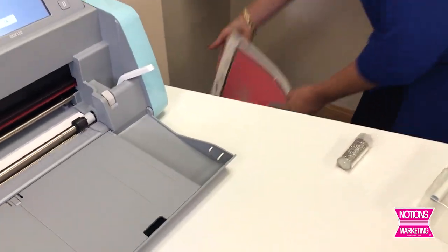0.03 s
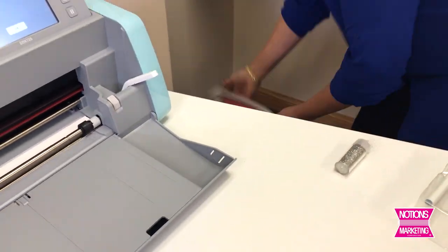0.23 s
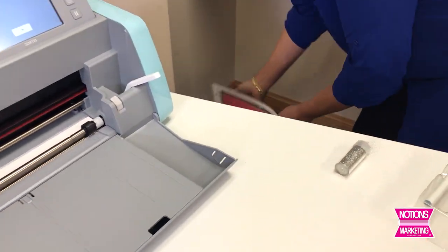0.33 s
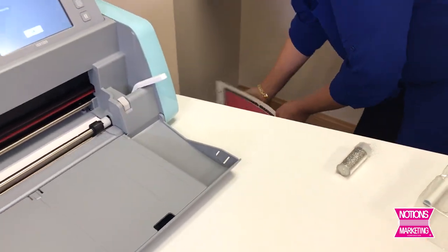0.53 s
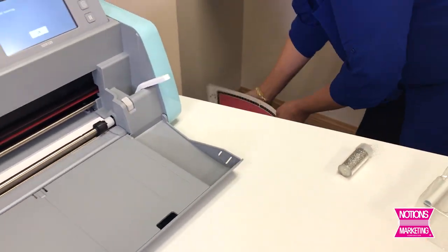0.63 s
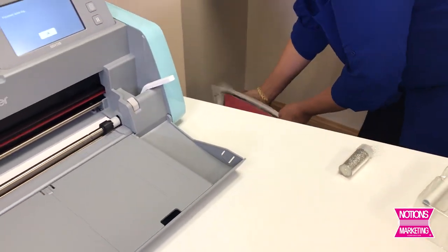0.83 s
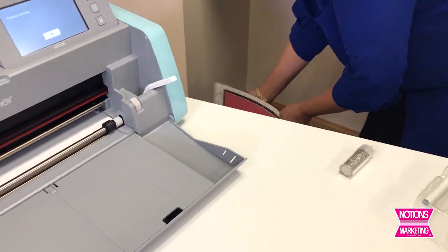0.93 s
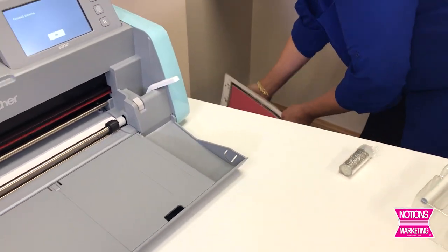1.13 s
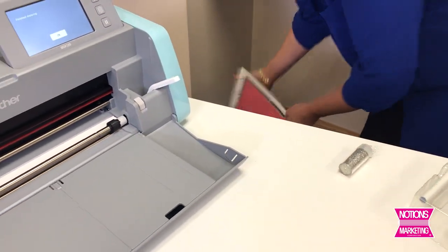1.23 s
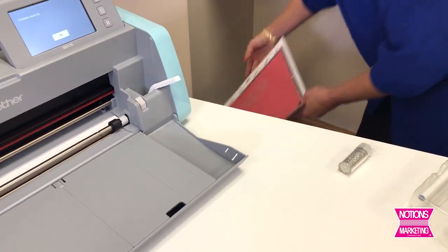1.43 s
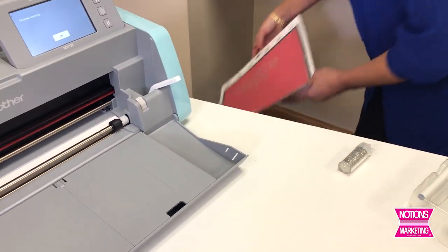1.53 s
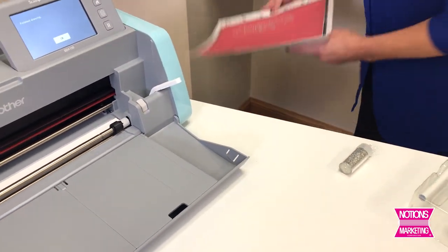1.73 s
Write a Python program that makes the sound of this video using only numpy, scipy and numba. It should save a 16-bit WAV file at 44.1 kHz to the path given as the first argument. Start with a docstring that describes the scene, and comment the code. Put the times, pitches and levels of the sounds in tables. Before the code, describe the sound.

A stiff plastic mat knocks against a hollow bin in quick, bright, rattling taps with low booms, after a brief rustle and scrape; it then quiets to faint handling. Close microphone, small room.

```python
"""Quick bright taps, about seven a second: a stiff plastic mat knocked against a hollow bin below a table.
Each tap is a noise crack, then the sheet rattles on as dense clicks that ring the bin, and the hollow booms.
Swelling sines thud, band-passed noise bursts tick like loose grains, and filtered clicks make the sheet
rustle in the hands and scrape the rim. A small room answers with a short echo, over noise hush, hum and whine."""
import sys
import numpy as np
from scipy import signal
from scipy.fft import rfft, irfft
from scipy.io import wavfile
from numba import njit

SR = 44100
rng = np.random.default_rng(int(sys.argv[2]) if len(sys.argv) > 2 else 0)


def inscribe(sig):
    """Save sig as 16-bit PCM at rate SR to the path in sys.argv[1].

    A 1-D sig is mono; a 2-D sig holds one channel per row.
    Samples are clipped to [-1, 1] before scaling.
    """
    pcm = np.round(np.clip(np.atleast_2d(sig).T, -1, 1) * 32767)
    wavfile.write(sys.argv[1], SR, pcm.astype(np.int16))


def natural_amplitude(level_db):
    """Convert a level in decibels to a linear amplitude factor, elementwise."""
    exponent = np.asarray(level_db, float) / 20
    return 10 ** exponent


N = 79380  # 1.8 s


def unit(x):
    """Scale to rms 1."""
    return x / np.sqrt(np.mean(x ** 2))


def colour(x, points):
    """Shape the spectrum through (hz, db) points joined along log frequency, rms 1."""
    hz = np.arange(len(x) // 2 + 1) * SR / len(x) + 1
    point_hz, point_db = np.array(points).T
    gain_db = np.interp(np.log(hz), np.log(point_hz), point_db)
    return unit(irfft(rfft(x) * natural_amplitude(gain_db), len(x)))


def band(x, hz, width_hz):
    """Second-order Butterworth band-pass, its edges kept within the audible range."""
    edges_hz = np.clip([hz - width_hz / 2, hz + width_hz / 2], 20, SR / 2.1)
    return signal.sosfilt(signal.butter(2, edges_hz, "bandpass", fs=SR, output="sos"), x)


def fade(t, t60):
    """Falls 60 dB in t60 s."""
    return np.exp(-np.log(1000) * t / t60)


def swell(t, rise, t60):
    """Rises smoothly for rise s, then fades."""
    rising = np.sin(np.pi / 2 * np.clip(t / rise, 0, 1)) ** 2
    return rising * fade(np.maximum(t - rise, 0), t60)


def clicks(size, per_s, spread_db):
    """Random clicks of either sign and very uneven size, rms 1."""
    chance, sign, size_draw = rng.random((3, size))
    struck = chance < per_s / SR
    return unit(struck * np.sign(sign - .5) * natural_amplitude(-spread_db * np.log(1 - size_draw)))


def level_curve(points):
    """Amplitude over the whole scene through (time_s, level_db) points."""
    return natural_amplitude(np.interp(np.arange(N) / SR, *np.array(points).T))


def add(out, at_s, x):
    """Mix x in from at_s."""
    i = int(at_s * SR)
    out[i:i + len(x)] += x[:N - i]


def room_tone():
    """Broad hush of coloured noise, wavering hum from narrow noise bands and a faint high steady whine."""
    # spectrum of the hush: hz, db (per Hz, relative)
    hush_colour = [(25, -60), (53, -6), (96, -7), (133, 10), (156, -2), (447, -28), (586, -18), (688, -28),
                   (1280, -27.5), (2140, -32), (2320, -33.5), (15700, -41)]
    # wavering low hum: centre_hz, width_hz, level_db
    hum_bands = [(48.1, 1.5, -56), (134.7, 13.4, -58.5)]
    hush_db, whine_hz, whine_db = -47.5, 14250, -78
    hush = natural_amplitude(hush_db) * colour(rng.standard_normal(N), hush_colour)
    hum = np.zeros(N)
    for hz, width_hz, db in hum_bands:
        hum += natural_amplitude(db) * unit(band(rng.standard_normal(N), hz, width_hz))
    whine = natural_amplitude(whine_db) * np.sin(2 * np.pi * whine_hz * np.arange(N) / SR)
    return hush + hum + whine


def echo(x):
    """A small room as a decaying noise tail: lows linger, highs die early."""
    low_t60_s, high_t60_s, split_hz, onset_s = 0.53, 0.17, 250, 0.004
    t = np.arange(SR // 2) / SR
    noise = rng.standard_normal(len(t))
    low = signal.sosfilt(signal.butter(1, split_hz, fs=SR, output="sos"), noise)
    high = noise - low
    tail = low * fade(t, low_t60_s) + high * fade(t, high_t60_s)
    tail = tail * np.clip(t / onset_s, 0, 1)
    return signal.fftconvolve(x, tail / np.sqrt(np.sum(tail ** 2)))[:N]


def rustle():
    """Fine hiss of the flexing sheet: dense tiny clicks run together."""
    # how loud the sheet hisses: time_s, level_db
    rustle_levels = [(0, -59), (.19, -56), (.26, -55.5), (.35, -50.5), (.385, -61), (.45, -63),
                     (.55, -75.5), (.72, -59), (.78, -87), (.86, -56), (.92, -68), (1.03, -94), (1.4, -69),
                     (1.57, -64), (1.8, -62.5)]
    # spectrum of the hiss: hz, db (per Hz, relative)
    rustle_colour = [(590, -28), (1000, -3), (1140, -3), (1700, 4), (1930, -16), (2320, -1.5), (2510, -2),
                     (4080, -1), (15700, -7.5)]
    per_s, spread_db = 8100, -2
    return colour(clicks(N, per_s, spread_db), rustle_colour) * level_curve(rustle_levels)


def scrape():
    """The sheet scrapes the rim and the hands: sparser, coarser and darker clicks."""
    # how loud the sheet scrapes: time_s, level_db
    scrape_levels = [(.10, -57.5), (.2, -57), (.28, -40), (.33, -35.5), (.365, -39), (.385, -49.5),
                     (.395, -36.5), (.43, -55.5), (.45, -55), (1.5, -62), (1.62, -61.5), (1.685, -52.5),
                     (1.71, -65.5), (1.75, -54), (1.78, -64.5)]
    # spectrum of the scraping: hz, db (per Hz, relative)
    scrape_colour = [(180, -2.5), (300, 1.5), (538, -11), (937, -8), (1990, -11), (2170, -15),
                     (3470, -16.5), (9000, -34.5), (11700, -62), (19800, -120)]
    per_s, spread_db = 2200, 2.6
    return colour(clicks(N, per_s, spread_db), scrape_colour) * level_curve(scrape_levels)


def ticks():
    """Grains and edges tick: short noise bursts, each in its own band, sharpest in the first instant."""
    # grains and edge ticks: start_s, level_db (of the body, before the snap), centre_hz, width_hz, t60_s
    tick_table = [(0.117, -45.5, 1680, 400, 0.045), (0.12, -52.5, 7900, 8150, 0.044),
                  (0.222, -37, 7500, 5500, 0.035), (0.257, -46.5, 13000, 4970, 0.039),
                  (0.292, -47, 7800, 9000, .05), (0.293, -56, 1650, 300, 0.082),
                  (.322, -48, 3540, 400, .06), (0.356, -48, 2750, 298, 0.083),
                  (0.36, -44, 4270, 500, 0.045), (0.3907, -43, 8800, 15700, 0.017),
                  (0.394, -47, 7560, 13100, 0.06), (0.484, -43, 7830, 13500, 0.13),
                  (0.532, -58, 14100, 2917, 0.022), (.566, -45, 11700, 9900, 0.018),
                  (.59, -59, 13500, 4000, 0.22), (0.692, -47, 7960, 12000, 0.073),
                  (0.695, -49.5, 5700, 900, 0.074), (.694, -52, 9300, 900, .07),
                  (.712, -54, 13300, 2540, 0.1), (.731, -57, 13500, 2000, 0.099),
                  (.826, -48, 9100, 4030, 0.08), (0.926, -38.5, 2500, 3530, 0.082),
                  (0.98, -46.5, 8500, 11600, 0.087), (1.121, -45.5, 9600, 10400, 0.047),
                  (1.335, -58, 5000, 7000, 0.12), (1.362, -48.5, 8200, 11200, 0.014),
                  (1.387, -64, 13400, 1500, 0.031), (1.424, -55.5, 3870, 3900, 0.055),
                  (1.449, -59, 5880, 1500, 0.077), (1.684, -58, 3580, 3930, 0.042),
                  (1.728, -59.5, 4080, 5000, 0.11), (1.747, -53.5, 2700, 2740, 0.095),
                  (1.064, -33, 4750, 600, 0.028), (1.066, -31.5, 3360, 497, 0.076),
                  (1.077, -38.5, 3800, 1200, 0.11), (.798, -37, 3570, 1800, 0.045)]
    snap_db, snap_t60_s = 4, 0.004  # snap relative to the tick's body
    out, t = np.zeros(N), np.arange(SR // 5) / SR
    for at, db, hz, width_hz, t60 in tick_table:
        burst = unit(band(rng.standard_normal(len(t)), hz, width_hz))
        decay = fade(t, t60) + natural_amplitude(snap_db) * fade(t, snap_t60_s)
        add(out, at, natural_amplitude(db) * burst * decay)
    return out


def thuds():
    """The bin wall thuds or the bent sheet slaps flat: each swings on one note that swells and dies."""
    # notes that stand out: start_s, level_db, pitch_hz, swell_s, t60_s
    thud_table = [(0.22, -32, 579, 0.0041, 0.066), (0.241, -32, 492, 0.008, 0.14),
                  (0.243, -51, 640, 0.005, 0.093), (0.246, -33, 830, 0.0093, 0.14),
                  (0.297, -24, 237.5, 0.0074, 0.26), (0.298, -27.5, 188.7, 0.026, 0.19),
                  (.333, -24, 237.2, 0.0074, 0.11), (0.505, -17.5, 245.7, 0.0077, 0.051),
                  (0.652, -32, 116, 0.012, 0.14), (0.796, -21, 1433, 0.003, 0.044),
                  (0.797, -22, 2330, .003, 0.043), (0.797, -27.5, 2030, 0.0047, 0.1),
                  (1.071, -22, 2180, 0.0026, 0.086), (1.073, -17.5, 1350, .008, 0.047),
                  (1.076, -25, 1252, 0.015, 0.12), (1.09, -24, 780, 0.0045, 0.068),
                  (1.255, -29, 306, 0.011, .09), (1.258, -28, 375, 0.013, 0.06),
                  (1.39, -30.5, 124, 0.011, 0.086), (1.362, -31, 817.4, 0.012, 0.077),
                  (1.372, -29.5, 664, 0.018, 0.052), (1.41, -39, 555, 0.011, 0.1),
                  (1.352, -40.5, 380, 0.0033, 0.27), (0.79, -28, 112, 0.0043, 0.15),
                  (0.806, -28.5, 301, 0.0065, .12), (0.933, -19, 139.4, 0.0096, 0.051),
                  (1.066, -26, 120.6, 0.012, 0.048), (1.222, -22, 144.5, 0.0073, 0.071),
                  (1.352, -31, 118, 0.012, 0.12), (0.563, -30.5, 196, 0.0015, 0.18),
                  (1.024, -33.5, 230, 0.0091, 0.086), (1.16, -31, 241.8, 0.006, 0.31)]
    out, t = np.zeros(N), np.arange(SR // 2) / SR
    for at, db, hz, rise, t60 in thud_table:
        add(out, at, natural_amplitude(db) * swell(t, rise, t60) * np.sin(2 * np.pi * hz * t))
    return out


@njit
def sweep(x, hz, k):
    """State-variable low-pass with a moving edge hz; a larger k damps it more."""
    y, b, l = np.empty(len(x)), 0., 0.
    for i in range(len(x)):
        g = np.tan(np.pi * hz[i] / SR)
        v = (b + g * (x[i] - l)) / (1 + g * (g + k))
        y[i] = l + g * v
        b, l = 2 * v - b, 2 * y[i] - l
    return y


def crack_noise(t):
    """The blow: a bright noise crack, then a quieter spray of grains sliding off."""
    # spectrum of the crack: hz, db (per Hz, relative)
    crack_colour = [(470, -44), (800, 0.5), (1740, -3), (2870, -7), (4680, -11.5), (7540, -18.5),
                    (9570, -20), (14500, -55), (16000, -44)]
    # spectrum of the grains sliding off: hz, db (per Hz, relative)
    spray_colour = [(1760, -3.5), (3000, -5.5), (4070, -1), (6290, -5), (9470, -5), (10400, -10),
                    (12900, -1), (15700, -9)]
    crack_t60_s, spray_db, spray_t60_s = 0.094, -12.5, 0.26
    crack = colour(rng.standard_normal(len(t)), crack_colour) * fade(t, crack_t60_s)
    spray = colour(rng.standard_normal(len(t)), spray_colour) * fade(t, spray_t60_s)
    return crack + natural_amplitude(spray_db) * spray


def body_ring(t):
    """Decaying modes of bin and sheet, scattered from tap to tap as the sheet is held differently; energy 1."""
    # modes before scatter: pitch_hz, level_db (relative), t60_s
    body_modes = [(256, 6, 0.023), (306, 16, 0.054), (368, -7, 0.025), (433, 7.5, 0.057), (577, -7, 0.088),
                  (663, 6.5, 0.05), (846, -4, 0.093), (1050, -6, 0.21), (1170, -36, 0.035),
                  (1460, -5.5, 0.22), (1500, -5, 0.009), (1696, 11, 0.025), (1930, 0, 0.019),
                  (2300, -22, 0.036)]
    scatter_db, bend = 2, .05  # bend: pitch scatter as a fraction
    hz, db, t60 = np.array(body_modes, float).T[:, :, None]
    mode_amp = natural_amplitude(db + scatter_db * rng.standard_normal(hz.shape))
    mode_hz = hz * (1 + bend * rng.standard_normal(hz.shape))
    ring = (mode_amp * fade(t, t60) * np.sin(2 * np.pi * mode_hz * t)).sum(axis=0)
    return ring / np.sqrt(np.sum(ring ** 2))


def sheet_rattle(t, hz, span, rise, fall):
    """Clicks of sheet on bin in a band that darkens as they calm, which also ring the body."""
    per_s, spread_db, sink_oct_per_s, body_db = 6700, 1.8, 5, -14
    top_hz = hz * 2 ** (-sink_oct_per_s * t)
    push = clicks(len(t), per_s, spread_db)
    for damping in (1.8, 1.3, .8):  # a steep upper edge in three stages
        push = sweep(push, top_hz, damping)
    for _ in range(2):  # take away what lies below the band
        push = push - sweep(push, top_hz / 2 ** span, 2.)
    # make up for the power lost as the band sinks
    push = push * np.sqrt(SR / 2 / top_hz) * swell(t, rise, fall)
    ringing = signal.fftconvolve(push, body_ring(t[:SR // 5]))[:len(t)]
    return push + natural_amplitude(body_db) * ringing


def hollow_boom(t):
    """The bin's hollow booms: a low noise band that swells and fades."""
    low_hz, high_hz, swell_s, t60_s = 90, 585, 0.015, 0.37
    boom = unit(band(rng.standard_normal(len(t)), (low_hz + high_hz) / 2, high_hz - low_hz))
    return boom * swell(t, swell_s, t60_s)


def taps():
    """Mat on bin: every tap sums a crack, a sinking rattle that rings the body, and a boom of the hollow."""
    # taps: start_s, crack_db, rattle_db, rattle_swell_s, rattle_t60_s,
    # top_hz (upper edge of the rattle at its start), span_oct (band below that edge, octaves), boom_db
    tap_table = [(.211, -33.5, -36.5, 0.03, 0.95, 1790, 1.9, -39.5),
                 (.474, -40, -34.5, 0.035, 0.16, 2086, 0.74, -31.5),
                 (.642, -38, -33, 0.038, 0.26, 1890, 2.6, -28.5),
                 (.785, -33, -31.5, 0.013, 0.37, 2130, 2.4, -30),
                 (.797, -45, -22, 0.0016, 0.12, 2750, 1.17, -31.5),
                 (0.925, -35.5, -29.5, 0.021, 0.25, 2220, 0.71, -28.5),
                 (1.064, -29, -20.5, 0.013, 0.25, 2380, 0.93, -26),
                 (1.212, -34, -31.5, 0.051, 0.29, 1670, 1.44, -32.5),
                 (1.3485, -37, -33.5, 0.0093, 0.42, 1050, 0.2, -40)]
    out, t = np.zeros(N), np.arange(SR // 2) / SR
    for at, crack_db, rattle_db, rise, fall, hz, span, boom_db in tap_table:
        tap = natural_amplitude(crack_db) * crack_noise(t)
        tap = tap + natural_amplitude(rattle_db) * sheet_rattle(t, hz, span, rise, fall)
        tap = tap + natural_amplitude(boom_db) * hollow_boom(t)
        add(out, at, tap)
    return out


def scene():
    """Mat and bin close by, their echo from the small room, and the room's own tone; one channel."""
    echo_db = -11.5
    near = rustle() + scrape() + ticks() + thuds() + taps()
    return (room_tone() + natural_amplitude(echo_db) * echo(near) + near)[None]


def low_pass(x):
    """A steep low-pass at 16.8 kHz: the treble ends there."""
    return signal.sosfilt(signal.butter(12, 16810, fs=SR, output="sos"), x)


def record(dry):
    """The recorder cuts the top with a steep low-pass at 16 kHz."""
    top_cut = signal.ellip(8, .2, 40, 16000, fs=SR, output="sos")  # ripple 0.2 dB, stop band -40 dB
    mix = signal.sosfilt(top_cut, dry)
    return low_pass(mix)


dry = scene()
out = record(dry)
inscribe(out)
```